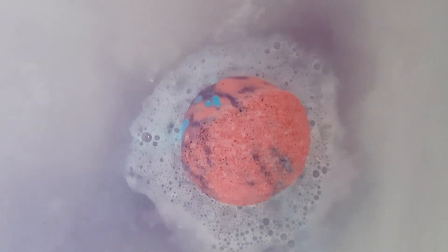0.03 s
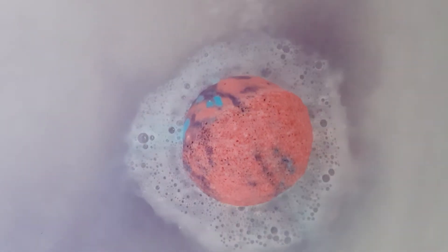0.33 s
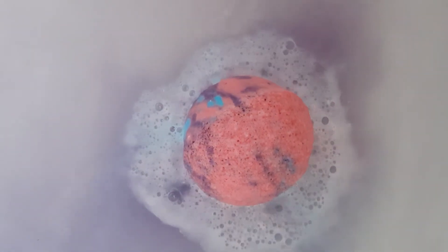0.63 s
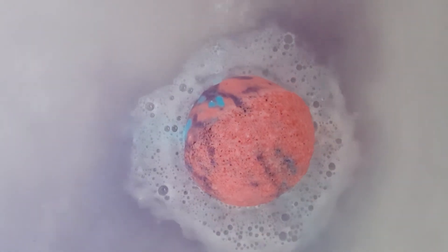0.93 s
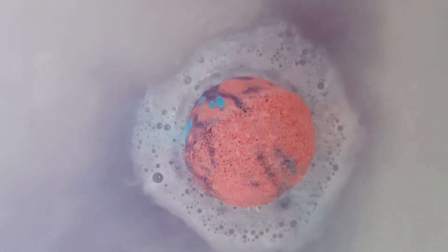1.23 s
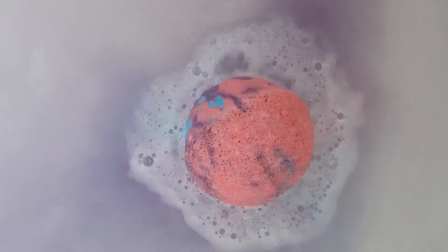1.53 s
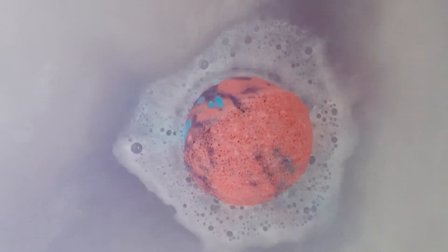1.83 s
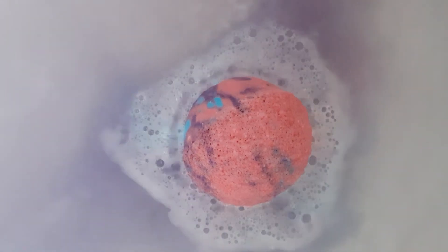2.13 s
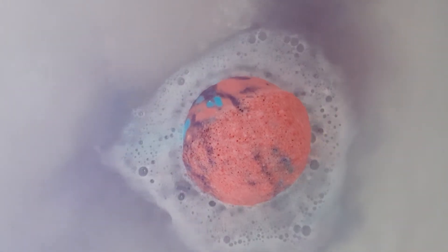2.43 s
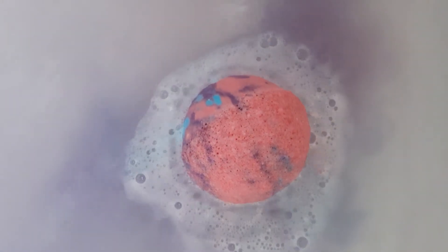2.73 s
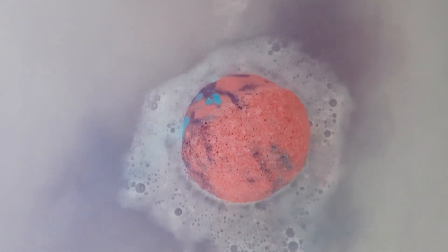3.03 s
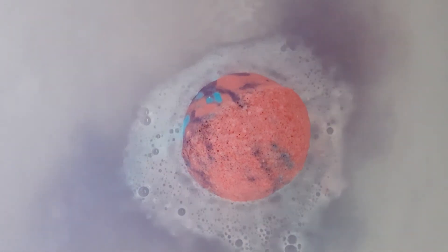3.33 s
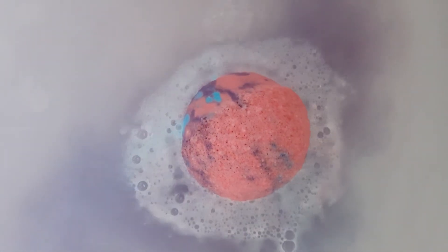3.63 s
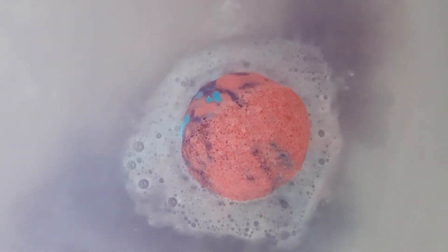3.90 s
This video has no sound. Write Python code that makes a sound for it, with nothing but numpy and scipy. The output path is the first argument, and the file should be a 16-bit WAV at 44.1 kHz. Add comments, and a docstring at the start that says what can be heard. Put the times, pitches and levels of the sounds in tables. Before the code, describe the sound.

Close over a bathtub, a dissolving bath bomb gives off a continuous, grainy hiss. Irregular little plips, dry crackles and brief sizzles come from the foam, echoing lightly over a low rumble in the bathroom.

```python
"""A bath bomb fizzes in a tub of water, heard from close above in a bathroom.
Countless tiny bubbles merge into a steady, grainy hiss. Larger ones in the foam ring with short
pitched plips, foam films tear with dry snaps and ticks, and patches of fine foam sizzle away.
The tub walls and the room echo the plips, snaps and ticks, and a low rumble hangs in the room."""
import sys
import numpy as np
from scipy import signal
from scipy.fft import rfft, irfft
from scipy.io import wavfile
from scipy.ndimage import uniform_filter1d

SR = 44100
rng = np.random.default_rng(int(sys.argv[2]) if len(sys.argv) > 2 else 0)


def output_pcm(signal):
    """Save a mono or channel-first signal as 16-bit PCM at the path in sys.argv[1].

    Samples are clipped to [-1, 1] before scaling.
    """
    pcm = np.clip(np.atleast_2d(signal).T, -1, 1) * 32767
    wavfile.write(sys.argv[1], SR, np.round(pcm).astype(np.int16))


N = 176400

# Level ride of the foam, used around its mean: t/s, level/dB
FOAM_RIDE = [(0.02, -35.5), (0.14, -34.5), (0.25, -33), (0.4, -37), (0.5, -35), (0.58, -30.5), (0.7, -33),
             (0.74, -31), (0.89, -36), (0.9, -34), (1.03, -36.5), (1.08, -32), (1.18, -33.5), (1.2, -28),
             (1.27, -34), (1.6, -32), (1.76, -36), (2.01, -31), (2.08, -36), (2.1, -30.5), (2.34, -32.5),
             (2.36, -28.5), (2.48, -36), (2.59, -35.5), (2.6, -29), (2.62, -30.5), (2.91, -32.5),
             (2.92, -31), (3.08, -34.5), (3.3, -32.5), (3.35, -40.5), (3.37, -29), (3.45, -38.5),
             (3.59, -28.5), (3.67, -41.5), (3.71, -30.5), (3.77, -34.5), (3.88, -32.5)]
# Tone of the hiss, per half octave: f/Hz, level/dB
FIZZ_EQ = [(280, -50.5), (500, -44.5), (1000, -44.5), (2100, -45), (3200, -48.5), (4600, -54.5),
           (6500, -37.5), (8800, -44), (12000, -39.5), (15500, -41.5)]
# How much of the foam's ride the hiss takes: f/Hz, share/1
FIZZ_RIDE_DEPTH = [(2000, 0.21), (5000, 0.44), (9000, .08), (15000, 0.089)]
def fizz(foam_db, flicker_db=1.3):
    """Thousands of tiny bursts a second merge into a grainy hiss."""
    out = np.zeros((2, N))
    grains = np.array([[clicks(per_s=14000, spread_db=3.5) for _ in range(2)] for _ in range(2)])
    for k, hz in enumerate(17200 / 2 ** (np.arange(13) / 2)):
        mid, side = band(grains[k % 2], hz / 2 ** .25, hz * 2 ** .25)  # adjacent bands get unlike grains
        ride_db = at_hz(FIZZ_RIDE_DEPTH, hz) * foam_db + flicker_db * drift(rate_hz=22)
        gain = from_db(at_hz(FIZZ_EQ, hz) + ride_db)
        out += gain * lean(hz) * rms_one(widen(mid, side, hz))
    return out


def plip(hz, lag_s):
    """One stereo burst: the cavity swells, rings a few cycles and rises in pitch as it opens."""
    decay_s = 0.0016 * (hz / 1000) ** -0.78  # higher bubbles die sooner
    delay_s = np.maximum([[lag_s], [-lag_s]], 0)
    t = np.maximum(np.arange(int(12 * decay_s * SR)) / SR - delay_s, 0)
    age = t / decay_s
    envelope = age ** 0.67 * np.exp(-age)
    bend = 1 + 0.021 * (age / 2 - 2)
    return envelope / envelope.max() * np.sin(2 * np.pi * hz * t * bend)


MIC_LAG_S = 0.00031  # largest lead of one microphone over the other
FILM_DECAY_S = 0.0012
# Cues for the big bubbles: t/s, f/Hz, level before trim/dB, left over right/dB
POP_CUES = [(0.1213, 2200, -20, 2), (0.1742, 315, -13.5, 4), (0.305, 2590, -21, -1),
            (0.5706, 2300, -19.5, 6), (0.594, 2600, -21, 3), (0.6128, 3500, -19.5, 2),
            (0.623, 350, -17.5, 6), (0.7413, 470, -20.5, 10), (0.7426, 2480, -17.0, -1),
            (0.759, 4230, -21, 5), (0.774, 346, -20.5, 3), (0.7763, 2090, -23.5, 7.5),
            (0.8603, 1940, -25, 1), (0.9013, 1950, -17.5, 5), (0.9081, 2700, -21, 0), (0.922, 4150, -27, 9),
            (0.9964, 1920, -25, 6), (1.069, 5800, -18.5, 6), (1.0805, 1960, -21.5, 5),
            (1.1005, 4700, -18, 4), (1.129, 4770, -18.5, 1), (1.194, 310, -14.5, 2),
            (1.1933, 670, -25.5, 0), (1.2004, 3850, -23, 10), (1.296, 318, -15.5, 2),
            (1.4424, 2620, -20.5, 1), (1.5122, 3570, -20, -2), (1.5709, 2200, -15, 11),
            (1.603, 457, -14, 6), (1.626, 2030, -21, 15), (1.662, 1360, -24.5, 1), (1.7186, 4300, -21.5, 3),
            (1.858, 2030, -22, 3), (1.8785, 1940, -24.5, 6), (1.9375, 2030, -20, 22),
            (2.0257, 470, -18.5, 6), (2.0693, 384, -19.0, 1), (2.099, 5450, -21.5, 16),
            (2.1, 1820, -18.5, 14), (2.125, 4600, -22, 5), (2.1416, 580, -16, 0), (2.15, 3970, -16, -2),
            (2.211, 327, -15, 5), (2.244, 4400, -27, 1), (2.265, 2060, -22.5, 0), (2.3072, 592, -22, 2),
            (2.3335, 690, -23, 4), (2.361, 1900, -20, 15), (2.3783, 2100, -18, 1), (2.3893, 1870, -25, -2),
            (2.523, 1050, -24, 6), (2.5756, 4750, -20.5, 13), (2.5995, 3480, -17, 2.5),
            (2.6067, 293, -12.5, 7.5), (2.7034, 6180, -24.5, 7), (2.7186, 310, -14.5, 13),
            (2.7453, 546, -22.0, 3), (2.815, 1520, -25, -0.5), (2.836, 2370, -21.5, 4.5),
            (2.843, 5070, -25, 6.5), (2.8431, 580, -24.5, 1), (2.922, 2550, -17, -0.5),
            (2.9367, 2030, -19.5, 1), (2.9578, 624, -14, 5), (2.959, 2400, -25, -1),
            (2.975, 4840, -17.5, 9), (3.1422, 4600, -25.5, 8.5), (3.2004, 2120, -22.0, 3),
            (3.278, 1580, -23, 11), (3.366, 5600, -21.5, 10), (3.3744, 1400, -22, 1),
            (3.3857, 4060, -19, 2), (3.5412, 2080, -21, 2), (3.579, 3600, -19.5, -2),
            (3.6507, 560, -31, -5.5), (3.694, 2100, -21.5, 7), (3.7066, 1720, -21, 0),
            (3.729, 1680, -25, 15)]
def pops(trim_db=1.5, tick_db=-17.5, spray_db=-15, spray_decay_s=0.015, spray_octaves=0.54):
    """Big bubbles: a plip, a faint tick from the breaking film and a spray of bursting neighbours."""
    out, t = np.zeros((2, N)), np.arange(SR // 10) / SR
    for s, hz, db, left_db in POP_CUES:
        deep_db = -4.5 if hz < 560 else 0  # the deepest bursts sound softer
        gain = from_db(db + trim_db + deep_db) * rms_one(pan(left_db))
        lag_s = MIC_LAG_S * rng.uniform(-1, 1) * min(1, 1000 / hz)
        tick = band(rng.standard_normal((2, len(t))), hz / 2, hz * 4) * np.exp(-t / FILM_DECAY_S)
        neighbours = sparse_noise(len(t), per_s=hz / 4)
        mid, side = band(neighbours, hz / 2 ** spray_octaves, hz * 2 ** spray_octaves)
        spray = rms_one(widen(mid, side, hz)) * np.exp(-t / spray_decay_s)
        add(out, s, gain * plip(hz, lag_s))
        add(out, s, gain * (from_db(tick_db) * tick + from_db(spray_db) * spray))
    return out


# Level ride of the low gurgling, used around its mean: t/s, level/dB
GURGLE_RIDE = [(0.02, -24.5), (0.04, -36), (0.17, -30.5), (0.5, -37.5), (0.51, -30.5), (1.58, -31),
               (1.6, -25.5), (1.67, -25.5), (2.01, -37.5), (2.03, -27.5), (2.13, -30.5), (2.14, -28.5),
               (2.5, -32.5), (2.73, -25), (2.92, -43.5), (2.97, -29.5), (2.98, -25.5), (3.08, -31),
               (3.38, -28.5), (3.47, -39), (3.63, -25.5), (3.88, -32)]
# Tone of the small bubbles, per quarter octave: f/Hz, level/dB
BUBBLE_EQ = [(240, -65.5), (310, -39.5), (380, -46.5), (470, -52.5), (620, -42), (800, -51), (1000, -46.5),
             (1200, -49.5), (1700, -54.5), (2100, -46), (2500, -42), (3100, -56.5), (4000, -46.5),
             (4800, -47.5), (5800, -57.5), (9000, -59.5)]
def bubbles(gurgle_db, foam_db, per_s=1500):
    """Small bubbles burst at random; the low ones ride with the gurgling, the high ones with the foam."""
    out, pitches = np.zeros((2, N)), 250 * 2 ** (np.arange(22) / 4)
    for hz in pitches:
        triggers = clicks(per_s / len(pitches), spread_db=2.5)
        ring = plip(hz, MIC_LAG_S * rng.uniform(-1, 1))
        plips = signal.oaconvolve(triggers[None], ring, axes=1)[:, :N]
        ride_db = gurgle_db if hz < 1000 else foam_db
        out += from_db(at_hz(BUBBLE_EQ, hz) + ride_db) * lean(hz) * rms_one(plips)
    return out


# Cues for tearing films: t/s, level before trim/dB, low cut/Hz, high cut/Hz, left over right/dB
SNAP_CUES = [(0.123, -9, 2200, 16100, 5.5), (0.1825, -20.5, 4000, 12000, -10), (0.256, -33, 2000, 6000, 3),
             (0.5168, -17, 2000, 9000, 8), (0.6132, -26, 1510, 5960, -9.5), (0.7436, -20, 1500, 5000, -4.5),
             (0.759, -20, 2000, 6000, 5), (0.902, -36, 1300, 4000, -8), (1.0688, -19, 4000, 12000, 5),
             (1.2004, -16, 1800, 6000, 11), (1.616, -20, 7000, 15800, 0), (1.685, -21, 7000, 15800, 10),
             (1.939, -37, 1800, 6000, 14), (2.0882, -22, 7030, 15800, -1), (2.1503, -17.5, 3020, 15000, -3),
             (2.5877, -22, 6040, 15600, 3), (2.7053, -22, 6000, 15800, 6), (2.842, -19, 5030, 15800, 2),
             (2.958, -16, 900, 4000, -7), (2.9764, -17, 3970, 10000, 12), (2.981, -16, 7970, 15800, -2),
             (3.1724, -22, 7070, 15900, 3.5), (3.5534, -11, 8500, 15800, 1),
             (3.5801, -16.5, 2500, 12000, -10), (3.7362, -15.5, 2950, 15800, -3)]
def snaps(trim_db=-1.5, crack_db=2, crack_decay_s=0.0004):
    """Foam films tear: a pinpoint crack, then a millisecond or two of dry noise."""
    out, t = np.zeros((2, N)), np.arange(SR // 60) / SR
    envelope = np.exp(-t / FILM_DECAY_S) + from_db(crack_db) * np.exp(-t / crack_decay_s)
    rms_over_peak = np.sqrt(np.mean(envelope ** 2)) / envelope.max()
    for s, db, low_hz, high_hz, left_db in SNAP_CUES:
        tear = band(rng.standard_normal((2, len(t))) * envelope, low_hz, high_hz)
        add(out, s, from_db(db + trim_db) * rms_over_peak * rms_one(pan(left_db) * tear))
    return out


def crackle(foam_db, level_db=-42.5, decay_s=0.00055, bleed=0.4):
    """Small films snap with dry ticks at either side of the foam."""
    triggers = np.array([clicks(per_s=210, spread_db=1.5) for _ in range(2)])
    t = np.arange(SR // 300) / SR
    tick = rng.standard_normal((2, len(t))) * np.exp(-t / decay_s)
    ticks = signal.oaconvolve(triggers + bleed * triggers[::-1], tick, axes=1)[:, :N]
    return from_db(level_db + foam_db) * pan(left_db=-1) * rms_one(band(ticks, 2000, 4600))


# Cues for collapsing foam: t/s, level at the crest/dB
SIZZLE_CUES = [(1.07, -38), (1.958, -33.5), (2.11, -35), (2.675, -39.5), (2.83, -33.5), (2.975, -38),
               (3.36, -36.5)]
def sizzles(attack_s=0.018):
    """A patch of fine foam gives way: a quick swell of tiny bursts that dies away."""
    out, age = np.zeros((2, N)), np.arange(SR // 5) / SR / attack_s
    for s, db in SIZZLE_CUES:
        bursts = sparse_noise(len(age), per_s=4100)
        grains = rms_one(pan(left_db=-1) * band(bursts, 4300, 7500))
        add(out, s, from_db(db) * grains * age * np.exp(1 - age))
    return out


# Bright tone of the reverb: f/Hz, level/dB
ECHO_EQ = [(330, 0), (600, 1.5), (2000, 4), (5000, 1.5), (8000, 3), (15000, 11)]
def echoes(x, t60_s, predelay_s):
    """Dense reflections off the walls start after a delay and die away."""
    t = np.arange(SR) / SR
    mid, side = rfft(rng.standard_normal((2, SR)))
    hz = np.arange(len(mid)) + 1
    wash = irfft(widen(mid, side, hz) * from_db(at_hz(ECHO_EQ, hz)))
    decay = rms_one(from_db(-60 * t / t60_s) * (t > predelay_s))
    return signal.fftconvolve(x, wash * decay / np.sqrt(2 * SR), axes=1)[:, :N]


# Low resonances of the room: f/Hz, width/Hz, level/dB
ROOM_MODES = [(63.5, 6.2, -50.5), (84.3, 12.9, -35), (109.6, 10.2, -37.5), (151.6, 10.6, -46.5),
              (179, 19, -40.5), (219.5, 9.6, -44.5), (309, 37.6, -39), (346.1, 10.6, -40), (408.4, 38, -44),
              (460, 14, -74), (540.3, 13, -55.5)]
# Level ride of the deepest resonances: t/s, level/dB
DEEP_RIDE = [(0, 2), (.12, -6), (.19, 1.5), (.5, -4), (0.848, 0), (1.24, -0.5), (1.33, 1.5), (1.438, -1),
             (1.6, 4.5), (1.921, -2), (2.33, -0.5), (2.419, 9.5), (2.5, -1.5), (2.9, 0), (3.3, -1.5),
             (3.52, 3.5), (3.651, 1.5), (3.9, -6.5)]
def rumble(deep_below_hz=140, leveller_s=0.2):
    """Low noise booms in the room's resonances; the deepest ones are levelled, then swell and sink."""
    deep, upper = np.zeros((2, 2, N))
    for hz, width_hz, db in ROOM_MODES:
        noise = rng.standard_normal((2, N + SR // 4))
        mid, side = band(noise, hz - width_hz / 2, hz + width_hz / 2)[:, -N:]
        boom = from_db(db) * lean(hz) * rms_one(widen(mid, side, hz))
        add(deep if hz < deep_below_hz else upper, 0, boom)
    power = uniform_filter1d(np.mean(deep ** 2, axis=0), int(leveller_s * SR))
    swell = from_db(np.interp(np.arange(N) / SR, *np.transpose(DEEP_RIDE)))
    return upper + deep * swell * np.sqrt(power.mean() / power)


# Stereo width of the diffuse sound: f/Hz, left-right correlation/1
CORRELATION = [(100, 0.95), (200, 1), (330, 0.45), (600, 0.49), (1100, 0.42), (2300, -0.52), (3500, -0.26),
               (5500, -0.24), (15000, -0.031)]
def widen(mid, side, hz):
    """Two unrelated signals become a stereo pair with the room's width at that pitch."""
    alike = at_hz(CORRELATION, hz)
    return np.sqrt(1 + alike) * mid + np.sqrt(1 - alike) * side * np.array([[1], [-1]])


# Stereo balance of hiss, small bubbles and rumble: f/Hz, left over right/dB
BALANCE = [(80, 1.5), (170, 0), (320, 5.5), (600, 0), (1100, 3.5), (1800, 9.5), (2700, 0), (4500, 3.5),
           (6500, 2), (9500, -0.5), (15000, -0.3)]
def lean(hz):
    """Channel gains at that pitch, mostly favouring the left."""
    return pan(at_hz(BALANCE, hz))


def pan(left_db):
    """Gains of the two channels."""
    return from_db(np.array([[.5], [-.5]]) * left_db)


def from_db(db):
    """Decibels to gain."""
    return 10 ** (np.asarray(db) / 20)


def rms_one(x):
    """Scale to an rms of 1."""
    return x / np.sqrt(np.mean(x ** 2) + 1e-20)


def at_hz(points, hz):
    """Read a table on a log-frequency axis."""
    f, values = np.transpose(points)
    return np.interp(np.log(hz), np.log(f), values)


def ride(curve):
    """A fader move at every sample, in dB around the mean of its points."""
    s, db = np.transpose(curve)
    return np.interp(np.arange(N) / SR, s, db - db.mean())


def band(x, low_hz, high_hz):
    """Band-pass."""
    edges = [low_hz, min(high_hz, SR / 2 - 500)]
    return signal.sosfilt(signal.butter(2, edges, "band", fs=SR, output="sos"), x + 1e-18)


def drift(rate_hz, hop=40):
    """Slow random wander of spread 1."""
    pole = np.exp(-2 * np.pi * rate_hz * hop / SR)
    noise = rng.standard_normal(N // hop + 2002)
    slow = signal.lfilter([1], [1, -2 * pole, pole * pole], noise)[2000:]
    return np.interp(np.arange(N) / hop, np.arange(len(slow)), rms_one(slow))


def clicks(per_s, spread_db):
    """Random impulses, many weak and a few strong."""
    sizes = from_db(spread_db * np.minimum(rng.exponential(1, N), 5))
    return sizes * rng.choice([-1, 1], N) * (rng.random(N) < per_s / SR)


def sparse_noise(samples, per_s):
    """Two channels of scattered Gaussian impulses."""
    return rng.standard_normal((2, samples)) * (rng.random((2, samples)) < per_s / SR)


def add(out, s, sound):
    """Mix a stereo sound in at a time."""
    i = int(s * SR)
    out[:, i:i + sound.shape[1]] += sound[:, :N - i]


def scene():
    """Hiss and bursting bubbles, with echoes from tub and room, over the rumble."""
    gurgle_db, foam_db = ride(GURGLE_RIDE), ride(FOAM_RIDE)
    big, small = pops(), bubbles(gurgle_db, foam_db)
    films = snaps() + crackle(foam_db)
    send = small + from_db(-11.5) * films  # snaps are thrown upward and echo less
    tub_send = send + from_db(-8) * big  # big bubbles stand above the foam and echo less in the tub
    tub = echoes(tub_send, t60_s=0.038, predelay_s=0.00053)
    room = from_db(-4) * echoes(send + big, t60_s=0.23, predelay_s=0.007)
    return fizz(foam_db) + big + small + films + sizzles() + tub + room + rumble()


def record(dry, cutoff_hz=15800, end_s=3.905, fade_s=0.01):
    """A steep high cut, and a quick fade to silence just before the end."""
    fade = np.clip((end_s - np.arange(N) / SR) / fade_s, 0, 1)
    high_cut = signal.ellip(12, .1, 80, cutoff_hz, fs=SR, output="sos")
    return signal.sosfilt(high_cut, dry * fade)


dry = scene()
out = record(dry)
output_pcm(out)
```